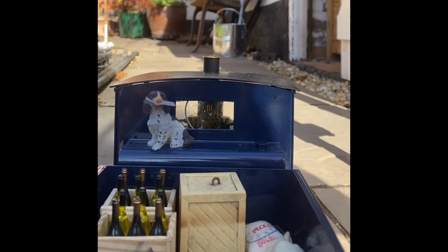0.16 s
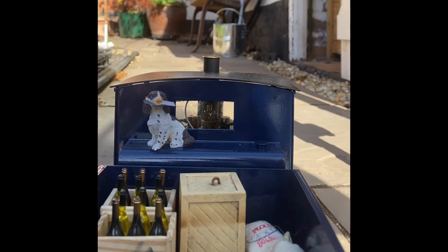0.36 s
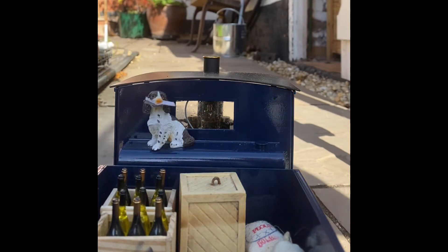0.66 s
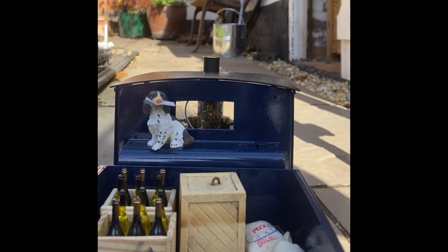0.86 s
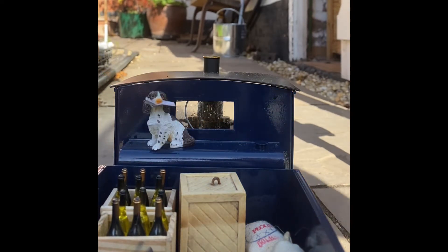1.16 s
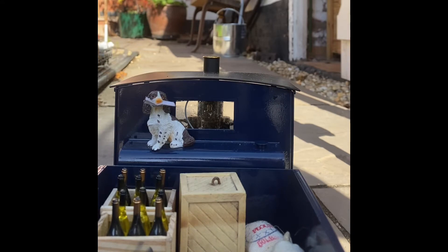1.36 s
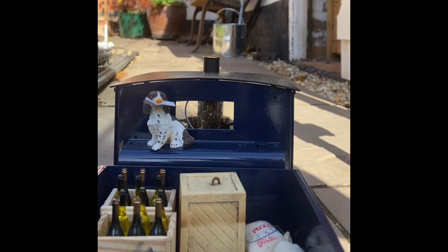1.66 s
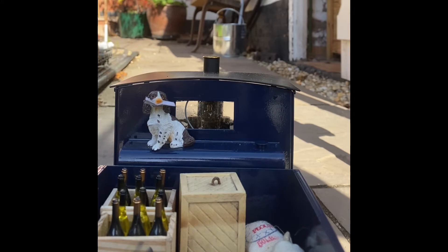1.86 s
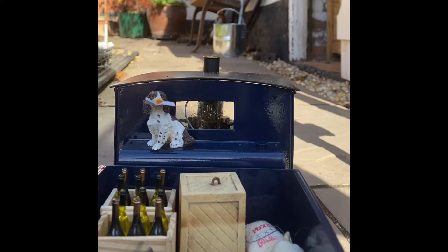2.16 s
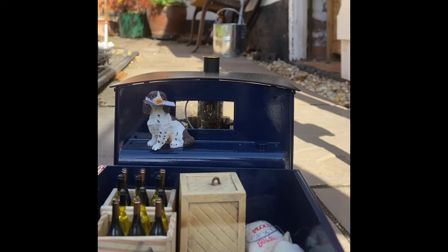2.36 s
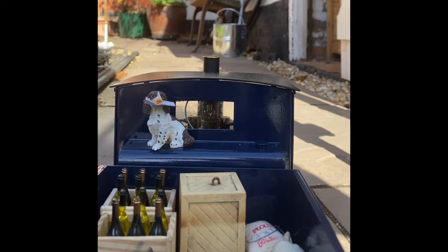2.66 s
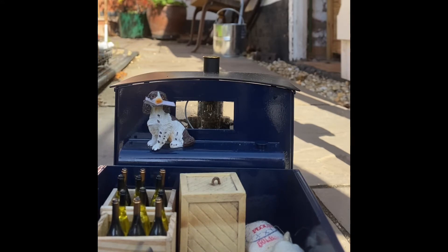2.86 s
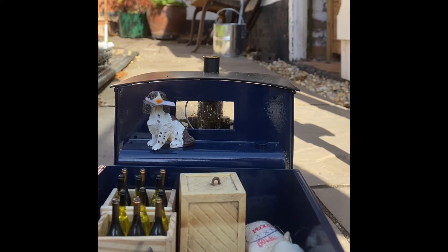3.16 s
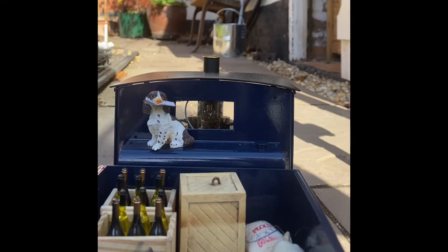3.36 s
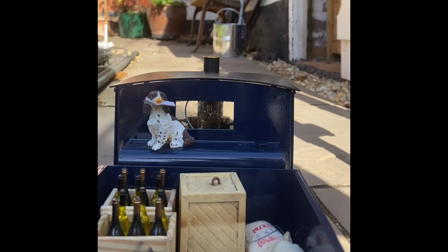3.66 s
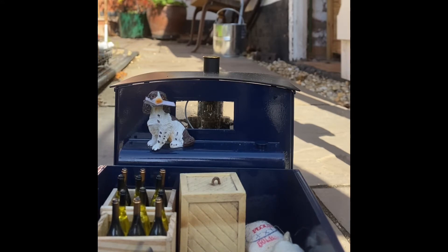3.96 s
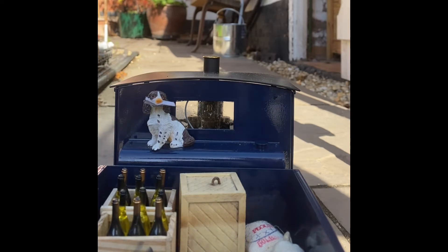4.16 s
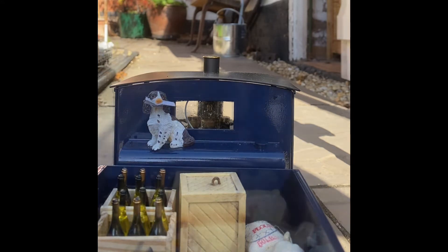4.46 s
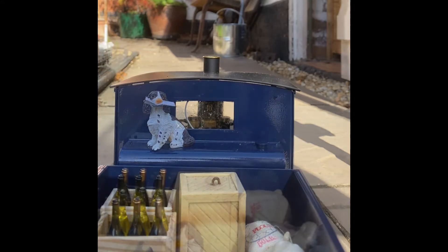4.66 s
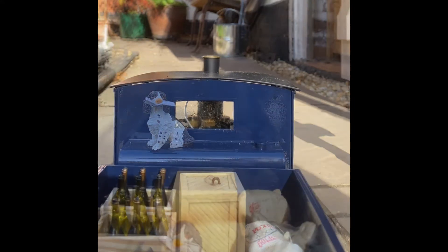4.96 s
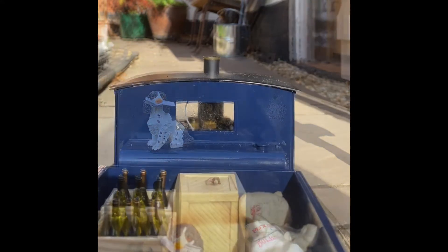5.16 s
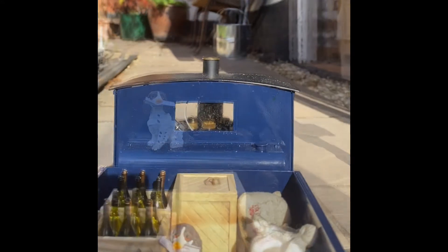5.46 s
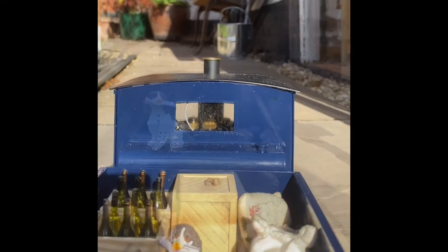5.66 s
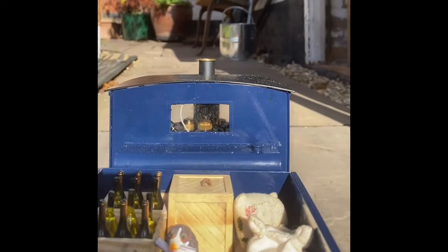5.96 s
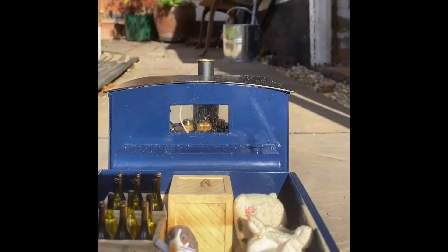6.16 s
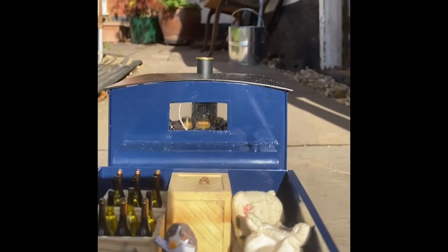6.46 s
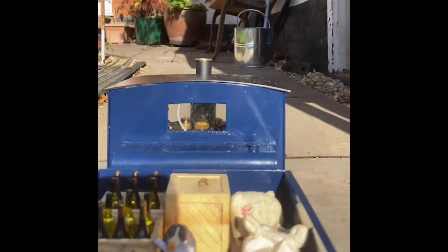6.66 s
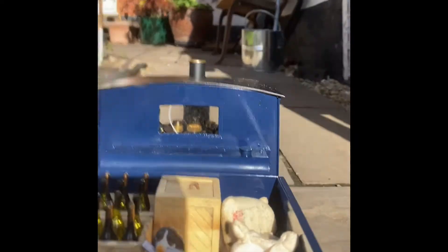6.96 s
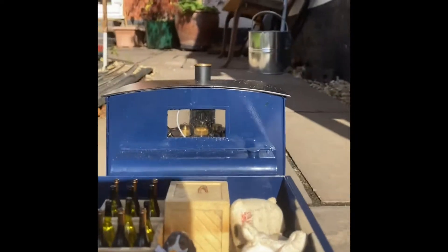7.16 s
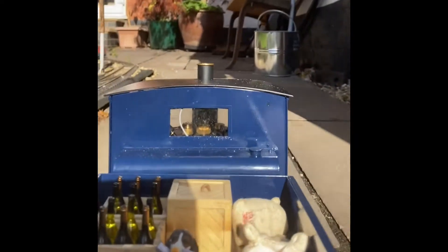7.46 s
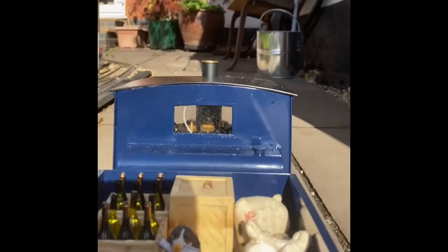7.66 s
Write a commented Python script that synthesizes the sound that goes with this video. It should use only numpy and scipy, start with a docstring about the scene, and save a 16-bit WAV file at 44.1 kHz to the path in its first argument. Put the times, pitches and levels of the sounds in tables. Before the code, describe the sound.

Close on board a small steam wagon outdoors, a burner flutters softly with dull flue pops and tiny steam spits; a faint far bird calls twice. After a few seconds the gears groan, soft exhaust puffs begin and quicken, and hard wheels growl over gritty paving. The rumble swells until the body booms, sheet metal clanks and the load clinks and knocks, much louder than the start.

```python
"""Steam wagon in a garden, from on board

A small live-steam wagon stands simmering, then sets off over paving slabs; two ports hear it on board.
Filtered noise makes the fluttering flame, the steam and the quickening exhaust; a far bird calls twice.
Random contacts drive the growl of the hard wheels, the grit and the ringing sheet metal.
Close to the microphone, bumps make the body boom and the load rattle: noise and short ringing strikes."""
import sys
import numpy as np
from scipy import signal
from scipy.fft import rfft, irfft, next_fast_len
from scipy.io import wavfile
from scipy.ndimage import uniform_filter1d

SR = 44100
rng = np.random.default_rng(int(sys.argv[2]) if len(sys.argv) > 2 else 0)


def log_audio(samples):
    """Write samples as a 16-bit WAV file to the path given in sys.argv[1]."""
    # one column per channel
    frames = np.atleast_2d(samples).T
    # limit to full scale, then quantise
    limited = np.clip(frames, -1, 1)
    pcm = np.round(limited * 32767).astype(np.int16)
    wavfile.write(sys.argv[1], SR, pcm)


N = 344421
TIME = np.arange(N) / SR   # s
SIZE = next_fast_len(N + SR // 4, real=True) // 2 * 2   # transform length, with room for ringing
FREQS = np.maximum(np.arange(SIZE // 2 + 1) * SR / SIZE, 1)   # Hz
STRIKE_AGE = TIME[:SR // 8]   # s since a strike

# Levels are relative: each layer sets its own gain on top of them.
# Two far bird notes: [t/s, length/s, start f/Hz, end f/Hz, level/dB]
BIRD_NOTES = [(3.09, 0.125, 4700, 4680, -72), (3.362, 0.04, 4600, 4710, -70)]
# The fire's low drone: [t/s, level/dB]
DRAUGHT = [(0.0, -54), (0.7, -53.5), (1.0, -43), (1.25, -51.5), (1.7, -53), (2.1, -51), (2.8, -48),
           (3.5, -53.5), (3.8, -42), (4.15, -48), (4.5, -53)]
# Pops in the flue: [t/s, level/dB]
POPS = [(0.567, -23), (0.694, -25), (0.753, -26), (1.094, -24), (1.288, -19.5), (1.587, -27), (1.727, -25),
        (1.827, -26), (1.873, -26), (3.772, -26), (3.792, -26), (4.037, -24)]
# Spits of steam: [t/s, spit level/dB, level/dB of the leak that trails it]
SPITS = [(0.071, -58, -66.5), (0.337, -61, -67), (0.44, -49, -75), (2.04, -57, -75), (4.275, -70, -68),
         (4.321, -43.5, -63), (4.334, -50, -72), (4.425, -62, -76), (4.641, -58, -78)]
# Engine speed: [t/s, exhaust beats per s]
ENGINE = [(5.16, 9.84), (5.45, 12.29), (5.8, 13.01), (6.25, 19.04), (6.45, 20.06), (6.65, 23.69),
          (6.9, 22.73), (7.45, 25.72), (7.8, 23.33)]
# The gears groan as they take up the load: [t/s, f/Hz, level/dB]
GEARS = [(5.04, 540, -70), (5.13, 560, -26.5), (5.31, 545, -25), (5.38, 580.4, -29), (5.9, 586, -25.5),
         (6.5, 598, -52)]
# How hard the paving shakes the wagon: [t/s, level/dB against full shaking]
SHAKING = [(4.55, -15), (4.62, -31), (4.73, -26), (4.8, -25), (5.03, -19), (5.11, -14.5), (5.25, -12.5),
           (5.44, -5.5), (5.62, -1), (6.15, 1), (6.46, 4.5), (6.62, -6), (6.72, -3.5), (6.84, 1.5),
           (7.8, 1)]
# The wheels drop into a joint and the whole load clatters: [t/s, length/s, level/dB]
CLATTERS = [(6.504, 0.02, -21), (6.534, 0.055, -22), (6.918, 0.045, -25), (6.982, 0.02, -28),
            (7.371, 0.04, -21.5), (7.416, 0.048, -22.5), (7.66, 0.025, -26)]
# Clinks of the loose load: [t/s, level/dB, f/Hz]
CLINKS = [(6.069, -26.5, 1880), (6.365, -37, 1870), (6.507, -16.5, 1590), (6.544, -18.5, 1857),
          (6.568, -23.5, 1815), (6.584, -40, 1810), (6.927, -24, 1647), (6.94, -26, 1720),
          (6.987, -28, 1655), (7.102, -31, 1574), (7.131, -29.5, 1590), (7.194, -26, 1704),
          (7.377, -25.5, 1610), (7.422, -21.5, 1664), (7.664, -25, 2390)]
# Clanks of the sheet-metal tray: [t/s, level/dB, f/Hz]
CLANKS = [(6.04, -22.5, 870), (6.937, -12.5, 856), (6.964, -20, 840), (7.022, -28, 815),
          (7.159, -17.5, 852), (7.453, -23, 895), (7.514, -23, 850), (7.595, -17, 880), (7.606, -17, 896),
          (7.67, -16, 814)]
# Grains of grit that crack under a rim: [t/s, level/dB]
CRACKS = [(5.79, -24.5), (5.832, -25.5), (6.510, -18.5), (6.542, -16), (6.933, -18), (7.22, -23)]
# Knocks of the wheels through the floor: [t/s, level/dB, settled f/Hz]
KNOCKS = [(5.145, -26, 300), (5.494, -19, 314), (5.573, -20, 294), (5.632, -13, 399), (5.885, -15, 321),
          (5.937, -16.5, 530), (6.303, -20, 367), (6.39, -11.5, 370), (6.511, -4.5, 377),
          (6.545, -9.5, 312), (6.941, -14, 367), (7, -17.5, 300), (7.195, -11.5, 315), (7.373, -11, 325),
          (7.395, -5, 272), (7.455, -9.5, 312)]
# A rim scuffs across the stone: [t/s, length/s, level/dB]
SCUFFS = [(5.122, 0.05, -43), (5.385, 0.075, -38.5), (5.62, 0.05, -37), (6.06, 0.085, -34),
          (6.335, 0.045, -34)]
# Jolts that set the body bouncing on its axles: [t/s, level/dB, f/Hz]
JOLTS = [(4.70, -28, 122), (4.833, -31.5, 101), (5.28, -18.5, 93), (5.345, -9, 91.6), (5.634, -8.5, 83.5),
         (5.892, -13, 118), (6.237, -8, 116), (6.305, -2, 77.7), (6.375, 0.5, 88.5), (6.44, -3, 78.5),
         (6.52, -5, 99.6), (6.553, -0.5, 89.3), (6.772, -6, 72.5), (6.82, 0.5, 98), (6.938, -1, 95.8),
         (6.995, -7, 105), (7.063, -1.5, 98), (7.138, -5.5, 108), (7.18, -2, 79), (7.236, -3.5, 104),
         (7.297, -8.5, 113), (7.382, -2, 101.8), (7.404, 0, 94.6), (7.513, -0.5, 81.5), (7.574, -8, 97.4),
         (7.621, -2.5, 112), (7.661, -1.5, 109)]
# Share of a stone's crunch, one row each: [gain] in both ports, in the left alone, in the right alone
STONE_PATHS = np.array([[.8], [1], [-.3]])

# Spectral shapes, each brought to unit power: [f/Hz, level/dB]
# Fire, steam jet and chimney
DRONE_SPECTRUM = [(25, -25), (50, -14), (73, 4), (95, -8), (200, -35)]
FLUE_SPECTRUM = [(25, -17.5), (110, -12.5), (180, -16.5), (340, -5), (510, -6.5), (560, -14), (620, -4),
                 (770, -7.5), (950, 1.5), (1160, -19.5), (1580, -22.5), (1870, -39), (2100, -24.5),
                 (2620, -25), (2820, -21), (3250, -48)]
SIMMER_SPECTRUM = [(2000, -40), (3300, -9), (5200, -6), (6500, 2), (7400, -14), (10400, -15), (12500, -20),
                   (15500, -20)]
JET_SPECTRUM = [(1200, -4), (3000, -8), (3300, 13), (3540, -1), (3680, 18), (3850, 1), (3980, 13),
                (4120, -5), (4280, 15), (4700, 4), (5600, -7), (8500, -18), (11000, -9), (15000, -20)]
EXHAUST_SPECTRUM = [(400, -2), (1200, -6), (1800, 2), (2700, -2), (4000, -16), (5000, -7), (5600, 3),
                    (6300, 2), (7400, -11), (9000, -20), (16000, -22)]
# Load: jumping cargo, chattering parts, floor thuds, sharp ticks
CARGO_SPECTRUM = [(200, -3), (380, 8), (600, 4), (850, 3), (1200, -1), (1650, 1), (2400, -5), (3300, -17),
                  (5600, -21), (9000, -27)]
CLATTER_SPECTRUM = [(500, -75), (1100, 3.5), (1550, 7), (2400, -12), (3300, -23), (6000, -19)]
THUD_SPECTRUM = [(120, -20.5), (300, 3), (430, -31), (620, -4.5), (1100, -14)]
TICK_SPECTRUM = [(1500, 20), (3800, 21), (5600, 25), (8500, 7), (12000, 7), (16000, 1)]
# Rolling: rims on the slabs, crushed grit, booming body
WHEELS_SPECTRUM = [(130, -11.5), (290, -1), (400, -12.5), (560, 0), (690, -11.5), (860, -5), (1050, -11.5),
                   (1400, -23.5)]
GRIT_SPECTRUM = [(700, 4), (1200, -17.5), (1650, 14), (2100, 1.5), (2500, 10.5), (3000, -0.5), (3500, 1.5),
                 (4600, -3), (5600, 4.5), (7000, -32.5), (8800, -8), (16000, -11)]
BODY_SPECTRUM = [(20, -49), (40, -19.5), (64, 1.5), (85, -1), (105, -8), (130, -3.5), (170, -8.5),
                 (230, -24), (330, -28.5), (600, -77.5)]
# Ringing modes of the sheet-metal cab and tray: [f/Hz, width/Hz, level/dB]
PANELS = [(589, 65, 12), (800, 90, 9), (1299, 27, 4), (1599, 60, 8), (1888, 100, 6), (2077, 54, 3),
          (2328, 35, 2), (2638, 25, 0), (2886, 65, -1), (3209, 43, -4), (3872, 25, -9), (4199, 38, -9),
          (5422, 92, -5), (5752, 66, -6)]

# How the two ports hear sound through the air: [f/Hz, likeness 0-1, left lead/rad]
AIR = [(100, .999, 0), (700, .9, 0), (950, .98, 0), (1300, .7, 0), (2300, .95, 0), (5000, .8, .2),
       (6000, .9, 1.3)]
# The same for sound through the chassis: [f/Hz, likeness 0-1, left lead/rad]
CHASSIS = [(200, .998, 0), (290, .985, 0), (400, .75, .4), (560, .45, 2.1), (900, .45, 2.2),
           (1200, .85, 3.1), (1750, .6, 3), (4000, .6, 2.7), (5600, .6, 1.8)]
# The port spacing turns the treble in and out of step, on both ways: [f/Hz, likeness 0-1, left lead/rad]
PORT_TREBLE = [(7300, .98, 3.14), (8800, .7, 4.6), (10400, .98, 6.28), (12000, .8, 7.9), (13400, .99, 9.42),
               (15500, .7, 10.8)]

FLAME_RISE_DB, FLAME_RISE_S = 3, 0.82   # the flame gathers strength at first
POP_KICK_DB = 16
FIRST_BEAT_S, FULL_BEATS_PER_S = 5.16, 24
PUFF_WIDTH_S, PUFF_DB = 0.011, -36.7   # half-width to 1/e; level at full speed
CREEP_S = 0.042   # the rolling fades in as the wheels begin to turn
ROLLING_FROM_S = 5.05   # chance blows start here
CUTOFF_HZ = 15900


def from_db(db):
    """Decibels to amplitude gain."""
    return 10 ** (np.asarray(db) / 20)


def rms_one(x):
    """Scale to unit power."""
    return x / np.sqrt(np.mean(np.abs(x) ** 2) + 1e-20)


def in_time(rows):
    """Each column of a curve at every sample."""
    s, *columns = np.transpose(rows)
    return [np.interp(TIME, s, column) for column in columns]


def in_pitch(rows):
    """Each column of a table at every frequency, on a logarithmic axis."""
    hz, *columns = np.transpose(rows)
    return [np.interp(np.log(FREQS), np.log(hz), column) for column in columns]


def drift(rate_hz):
    """Smooth chance with a spread of one: noise through two equal low-pass poles."""
    step = 40   # samples between the slow values
    r = np.exp(-2 * np.pi * rate_hz * step / SR)
    slow_noise = rng.standard_normal(N // step + 2002)
    slow = signal.lfilter([1], [1, -2 * r, r * r], slow_noise)[2000:]   # drop the filter's start
    return np.interp(np.arange(N) / step, np.arange(len(slow)), rms_one(slow))


def noise():
    """Three unrelated noises: one shared by both ports and one for each alone."""
    return rng.standard_normal((3, N))


def shared(drive):
    """A drive that has only the part shared by both ports."""
    return np.stack([drive, np.zeros(N), np.zeros(N)])


def response(spectrum):
    """Causal minimum-phase filter of unit power; it falls away above its last point."""
    falloff_db = 40 * np.log10(np.maximum(FREQS / spectrum[-1][0], 1))
    level_db = in_pitch(spectrum)[0] - falloff_db
    # folding the cepstrum forward makes the ringing follow the blow
    cepstrum = irfft(np.log(from_db(level_db)))
    cepstrum[1:SIZE // 2] *= 2
    cepstrum[SIZE // 2 + 1:] = 0
    return rms_one(np.exp(rfft(cepstrum)))


def panel_response():
    """Ringing modes of the sheet-metal cab and tray, neighbours in opposite sign; unit power."""
    total = 0
    for k, (hz, width_hz, db) in enumerate(PANELS):
        detuning = (FREQS / hz - hz / FREQS) * hz / width_hz
        total = total + (-1) ** k * from_db(db) / (1 + 1j * detuning)
    return rms_one(total)


def colour(drive, spectrum):
    """Pass a drive through a resonant path."""
    return irfft(rfft(drive, SIZE) * response(spectrum))[..., :N]


def even_out(x, evenness, size):
    """Take a share of the swells, averaged over size samples, out of a noise; unit power."""
    swell = np.sqrt(np.abs(uniform_filter1d(x ** 2, size=size)) + 1e-9)
    return rms_one(x / swell ** np.clip(evenness, 0, 1))


def at_ports(paths, ports):
    """Sum (drive, response) paths; the two ports hear them partly alike and out of step."""
    sound = sum(rfft(drive, SIZE) * path for drive, path in paths)
    alike, lead = in_pitch(ports + PORT_TREBLE)
    alike = np.clip(alike, 0, 1)
    pair = np.sqrt(alike) * sound[0] + np.sqrt(1 - alike) * sound[1:]
    pair[1] *= np.exp(-1j * lead)   # the right port lags
    return irfft(pair)[:, :N]


def clicks(times, levels_db):
    """One sharp impulse at each time."""
    kicks = np.zeros(N)
    index = np.clip((np.asarray(times) * SR).astype(int), 0, N - 1)
    kicks[index] = from_db(levels_db)
    return kicks


def blows(times, levels_db, decay_s):
    """Envelope that jumps at each blow and dies away exponentially."""
    kicks = clicks(times, levels_db) + 1e-18
    return signal.lfilter([1], [1, -np.exp(-1 / (decay_s * SR))], kicks)


def soften(envelope, attack_s):
    """Round off the attack of an envelope with a one-pole low-pass."""
    r = np.exp(-1 / (attack_s * SR))
    return signal.lfilter([1 - r], [1, -r], envelope)


def bursts(rows, edge_s):
    """Envelope that rises, holds for each row's length and dies away."""
    held = sum(from_db(level_db) * ((TIME >= s) & (TIME < s + length))
               for s, length, level_db in rows)
    return soften(held + 1e-18, edge_s)


def grains(per_s, spread_db, decay_s):
    """Envelope of many small random impacts of uneven strength; unit power."""
    when, size = rng.random((2, N))
    born = when < per_s / SR
    levels_db = -spread_db * np.log(np.maximum(size[born], .02))
    return rms_one(blows(TIME[born], levels_db, decay_s))


def contacts(per_s, spread_db):
    """Sharp random contacts of uneven strength, some shared by both ports, some at one; unit power."""
    when, size = rng.random((2, 3, N))
    touching = when < per_s / SR
    return rms_one(touching * from_db(spread_db * size) * rng.choice([-1, 1], (3, N)))


def swell_and_die(age, peak_s):
    """Envelope that rises to one at its peak and dies away."""
    return age / peak_s * np.exp(1 - age / peak_s)


def strikes(rows, swell_s, others_db, scatter, sag):
    """Each blow rings at its own pitch, sinking if sag is set, among five modes that vary by blow."""
    out, age = np.zeros(N + SR), STRIKE_AGE
    settling = age + sag * swell_s * (1 - np.exp(-age / swell_s))   # runs fast at first
    for (s, level_db, hz), chance in zip(rows, rng.standard_normal((len(rows), 5))):
        ratios = np.exp(scatter * chance)
        others = sum(np.sin(2 * np.pi * hz * ratio * settling) for ratio in ratios)
        ring = np.sin(2 * np.pi * hz * settling) + from_db(others_db) * others
        start = int(s * SR)
        out[start:start + len(age)] += from_db(level_db) * swell_and_die(age, swell_s) * ring
    return out[:N]


def random_blows(count, low_hz, high_hz, level_db, spread_db, follows):
    """Rows (t/s, level/dB, f/Hz) of chance blows while the wagon rolls, harder as it shakes more."""
    when, size, pitch = rng.random((count, 3)).T
    s = ROLLING_FROM_S + when * (TIME[-1] - ROLLING_FROM_S)
    shake_db = np.interp(s, *np.transpose(SHAKING))
    blow_db = level_db + spread_db * (2 * size - 1) + follows * shake_db
    return np.transpose([s, blow_db, low_hz * (high_hz / low_hz) ** pitch])


def speed_db():
    """The engine's speed in dB against full speed."""
    return 20 * np.log10(np.maximum(in_time(ENGINE)[0], 1) / FULL_BEATS_PER_S)


def shaking(follows):
    """Gain that follows a share of the shaking in dB; nothing while the wagon stands."""
    moving = np.clip((TIME - SHAKING[0][0]) / CREEP_S, 0, 1)
    return from_db(follows * in_time(SHAKING)[0]) * moving


def bird():
    """Two thin, far notes: sines that glide slightly in pitch."""
    out = np.zeros(N)
    for s, length, start_hz, end_hz, level_db in BIRD_NOTES:
        part = np.clip((TIME - s) / length, 0, 1)
        turns = np.cumsum(start_hz + (end_hz - start_hz) * part) / SR
        envelope = np.sqrt(np.abs(np.sin(np.pi * part)))
        out += from_db(level_db) * envelope * np.sin(2 * np.pi * turns)
    return out


def drone(drone_db=-1, evenness=0.41):
    """The fire keeps up a soft, wavering low resonance: noise through a narrow bass peak."""
    resonance = colour(rng.standard_normal(N), DRONE_SPECTRUM)
    return from_db(in_time(DRAUGHT)[0] + drone_db) * even_out(resonance, evenness, size=3000)


def flutter():
    """The flame burns steadily, with a quick shallow flutter."""
    return rms_one(from_db(1.6 * drift(rate_hz=60)))


def boiler(fire_db=-38, simmer_db=-66, pulling_db=-2):
    """The flame flutters and pops in the flue; steam simmers, spits and leaks through a narrow gap."""
    rise_db = FLAME_RISE_DB * np.minimum(TIME / FLAME_RISE_S - 1, 0)
    # the flame softens just ahead of the rolling and stays softer
    ease_db = pulling_db * np.clip((TIME - SHAKING[0][0]) / CREEP_S + 1, 0, 1)
    flame = from_db(fire_db + rise_db + ease_db) * flutter()
    s, pop_db = np.transpose(POPS)
    pops = shared(clicks(s, pop_db + POP_KICK_DB))
    s, spit_db, leak_db = np.transpose(SPITS)
    spits = blows(s, spit_db, decay_s=0.0055)
    leak = blows(s, leak_db, decay_s=0.28) * rms_one(from_db(2.8 * drift(rate_hz=43.4)))
    jet = soften(leak + spits, attack_s=0.0016)
    return [(flame * noise() + pops, response(FLUE_SPECTRUM)),
            (from_db(simmer_db) * noise(), response(SIMMER_SPECTRUM)),
            (jet * noise(), response(JET_SPECTRUM))]


def exhaust(speed_power=2.1, uneven_db=2.8):
    """Each piston stroke lets a short puff of steam up the chimney, stronger with engine speed."""
    rate, = in_time(ENGINE)
    strokes = np.cumsum(rate) / SR
    strokes -= np.interp(FIRST_BEAT_S, TIME, strokes)
    off_beat_s = (strokes - np.maximum(np.round(strokes), 0)) / rate
    level_db = PUFF_DB + uneven_db * drift(rate_hz=23) + speed_power * speed_db()
    puffs = from_db(level_db) * np.exp(-(off_beat_s / PUFF_WIDTH_S) ** 2)
    return [(puffs * noise(), response(EXHAUST_SPECTRUM))]


def gears(groan_db=-1, waver_hz=14, rough_db=3):
    """A narrow, unsteady groan while the wagon gathers way: one sine wavering in pitch and level."""
    hz, level_db = in_time(GEARS)
    turns = np.cumsum(hz + waver_hz * drift(rate_hz=39.7)) / SR
    level = from_db(level_db + groan_db + rough_db * drift(rate_hz=25)) * (TIME > GEARS[0][0])
    return [(shared(level * np.sin(2 * np.pi * turns)), 1)]


def cargo(cargo_db=0, ring_db=-6):
    """Crates and bottles jump in ragged contacts that ring the tray; (chassis paths, air paths)."""
    jostle = bursts(CLATTERS, edge_s=0.0063) * contacts(per_s=700, spread_db=13)
    return ([(from_db(cargo_db) * jostle, response(CARGO_SPECTRUM))],
            [(from_db(ring_db) * jostle, panel_response())])


def load(clatter_db=4, ring_db=-3, thud_db=-9, tick_db=-18, crack_db=-1, clink_db=-2, clank_db=-1):
    """Floor thuds, tray clanks, loose parts chatter and grit cracks; (chassis paths, air paths)."""
    s, clink, _ = np.transpose(CLINKS)
    knock_s, knock, _ = np.transpose(KNOCKS)
    crack_s, crack = np.transpose(CRACKS)
    chatter = soften(blows(s, clink, decay_s=0.015), attack_s=0.0014)
    chatter = chatter * grains(per_s=7900, spread_db=-15.0, decay_s=0.001)
    ticks = blows(s, clink + tick_db, decay_s=0.0041)
    ticks = ticks + blows(crack_s, crack + crack_db, decay_s=0.0066)
    ticks = soften(ticks, attack_s=0.0015) * grains(per_s=1500, spread_db=3, decay_s=0.0017)
    thuds = blows(knock_s, knock + thud_db, decay_s=0.021)
    clinks = strikes(CLINKS, swell_s=0.0056, others_db=-8, scatter=0.27, sag=0)
    clanks = strikes(CLANKS, swell_s=0.0032, others_db=-31.0, scatter=0.27, sag=0)
    ringing = from_db(clink_db) * clinks + from_db(clank_db) * clanks
    through_chassis = [(from_db(clatter_db) * chatter * noise(), response(CLATTER_SPECTRUM)),
                       (thuds * noise(), response(THUD_SPECTRUM)),
                       (ticks * noise(), response(TICK_SPECTRUM))]
    through_air = [(from_db(ring_db) * chatter * noise(), panel_response()), (shared(ringing), 1)]
    return through_chassis, through_air


def clunks(clunk_db=-1):
    """The loaded floor gives a short clunk at each knock, sinking in pitch as it settles."""
    ring = strikes(KNOCKS, swell_s=0.0028, others_db=-18.5, scatter=0.318, sag=0.16)
    return from_db(clunk_db) * ring


def rattle():
    """Chance bumps knock the floor and tap the tray, stones crunch; (chassis paths, air paths)."""
    knocks = random_blows(count=70, low_hz=173.5, high_hz=350, level_db=-29.0, spread_db=4, follows=0.37)
    taps = random_blows(count=80, low_hz=530, high_hz=1002, level_db=-30, spread_db=0.5, follows=0.62)
    stones = random_blows(count=190, low_hz=1477, high_hz=3116, level_db=-40, spread_db=9, follows=0.73)
    knocking = strikes(knocks, swell_s=0.0054, others_db=-13.0, scatter=0.332, sag=0.086)
    tapping = strikes(taps, swell_s=0.0069, others_db=-17.0, scatter=0.206, sag=0)
    crunching = strikes(stones, swell_s=0.0047, others_db=-15.5, scatter=0.22, sag=0)
    return [(shared(knocking), 1), (crunching * STONE_PATHS, 1)], [(shared(tapping), 1)]


def wheels(growl_db=-26, grit_db=-35, ring_db=-36, speed_power=0.99):
    """Hard rims growl, crush grit and scuff, which rings the panels; (chassis paths, air paths)."""
    crushing = shaking(follows=1.0) * from_db(speed_power * speed_db())   # more with speed
    growl = shaking(follows=0.5) * grains(per_s=380, spread_db=5.5, decay_s=0.0063)
    grit = crushing * grains(per_s=1200, spread_db=3.5, decay_s=0.0063)
    scuffing = bursts(SCUFFS, edge_s=0.012)
    ringing = (from_db(ring_db) * crushing + scuffing) * contacts(per_s=450, spread_db=16.5)
    through_chassis = [(from_db(growl_db) * growl * noise(), response(WHEELS_SPECTRUM)),
                       (from_db(grit_db) * grit * noise(), response(GRIT_SPECTRUM))]
    return through_chassis, [(ringing, panel_response())]


def body(rumble_db=-16.0, bounce_db=-1.5, evenness=0.45, rocking_db=-47):
    """The body booms on its axles and rocks a little sideways; each jolt bounces it a few swings."""
    boom = even_out(colour(rng.standard_normal(N), BODY_SPECTRUM), evenness, size=1100)
    # rocking has opposite sign at the two ports
    rocking = colour(rng.standard_normal(N), BODY_SPECTRUM) * np.array([[1], [-1]])
    rumble = shaking(follows=0.98) * (from_db(rumble_db) * boom + from_db(rocking_db) * rocking)
    bounces = strikes(JOLTS, swell_s=0.0094, others_db=-14.5, scatter=0.37, sag=0)
    return rumble + from_db(bounce_db) * bounces


def scene(air_pan_db=-0.76):
    """Fire, steam and panels come through the air, wheels and load mostly through the chassis."""
    rolling, ringing = wheels()
    knocking, clanking = load()
    bumping, tapping = rattle()
    jostling, jangling = cargo()
    air = at_ports(boiler() + exhaust() + ringing + clanking + tapping + jangling, AIR)
    air = air * from_db([[air_pan_db / 2], [-air_pan_db / 2]])
    chassis = at_ports(rolling + knocking + bumping + jostling + gears(), CHASSIS)
    # these reach both ports alike, but for the body's slight rocking
    direct = bird() + drone() + clunks() + body()
    return air + chassis + direct


def record(dry):
    """The deepest bass is taken out; the microphone rounds off the loudest swings and cuts the top."""
    low_cut = signal.butter(2, 28, "high", fs=SR, output="sos")
    top_cut = signal.ellip(10, .1, 90, CUTOFF_HZ, fs=SR, output="sos")
    bass_cut = signal.sosfilt(low_cut, dry)
    rounded = bass_cut / (1 + (bass_cut / .92) ** 6) ** (1 / 6)
    return signal.sosfilt(top_cut, rounded)


dry = scene()
out = record(dry)
log_audio(out)
```